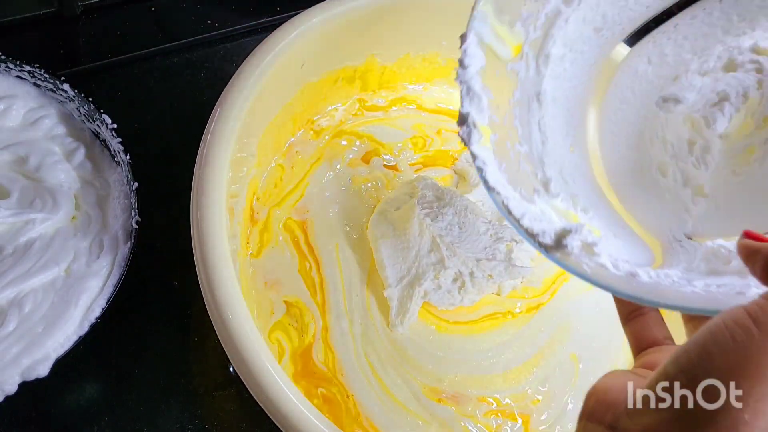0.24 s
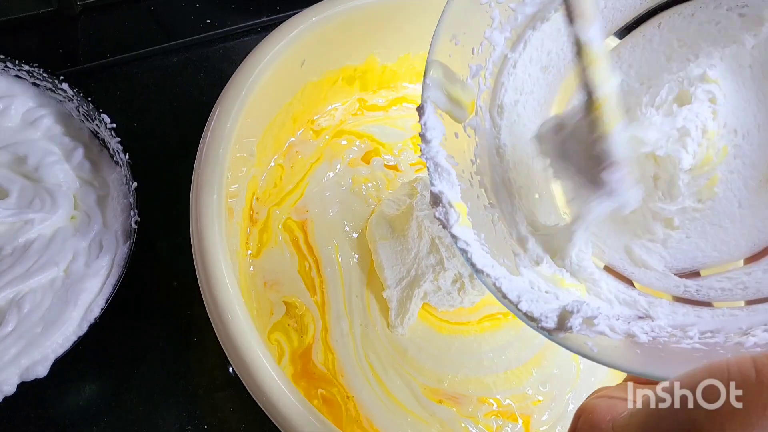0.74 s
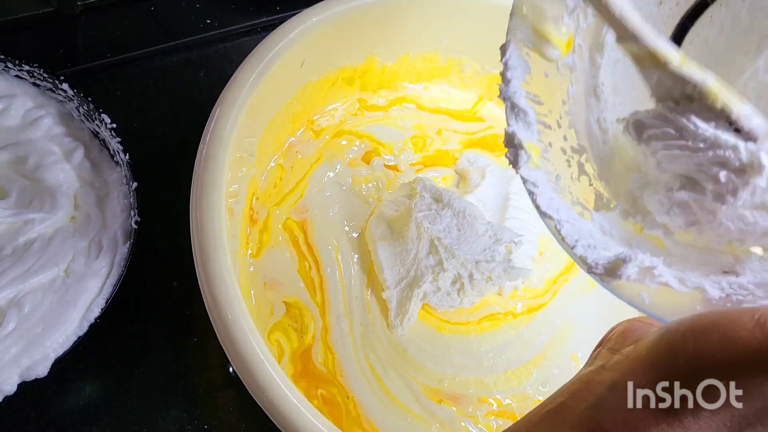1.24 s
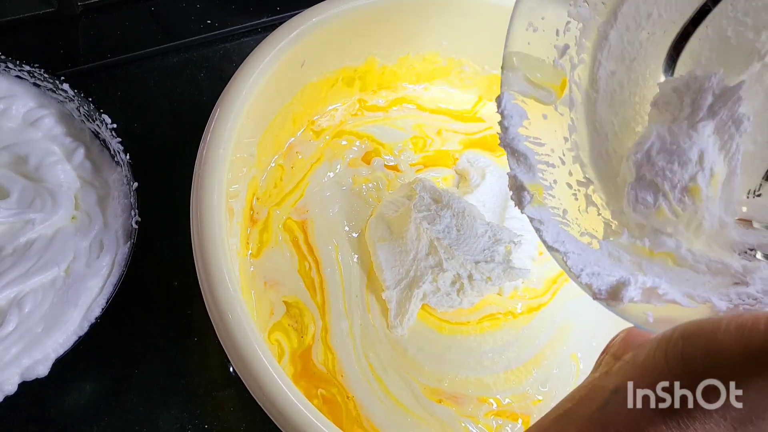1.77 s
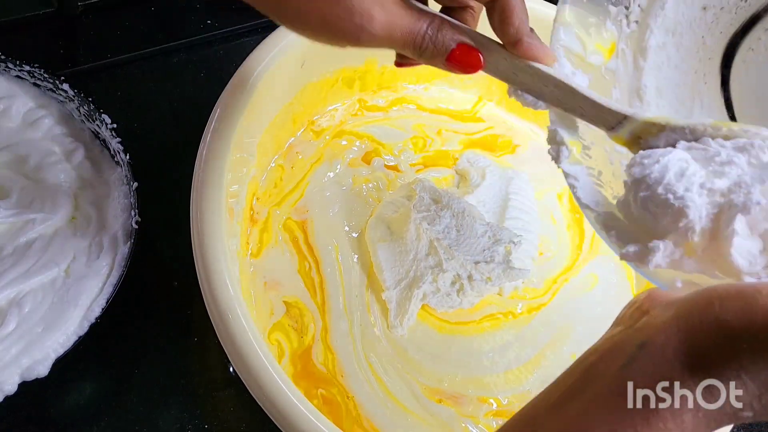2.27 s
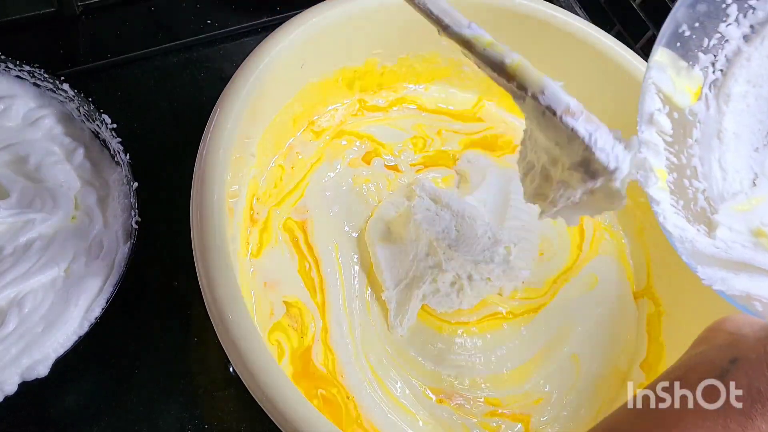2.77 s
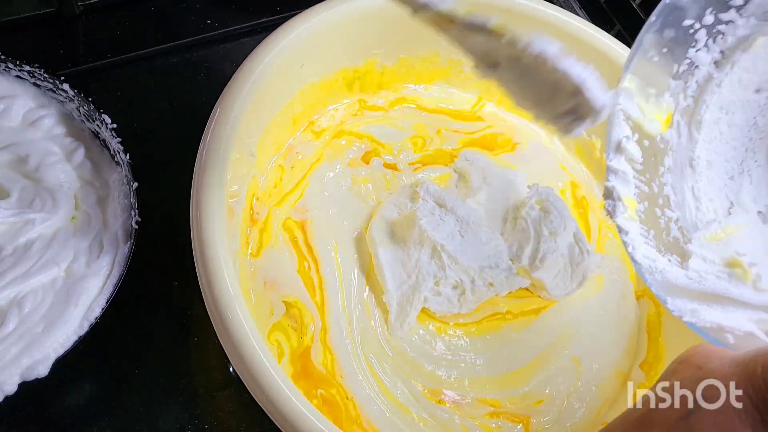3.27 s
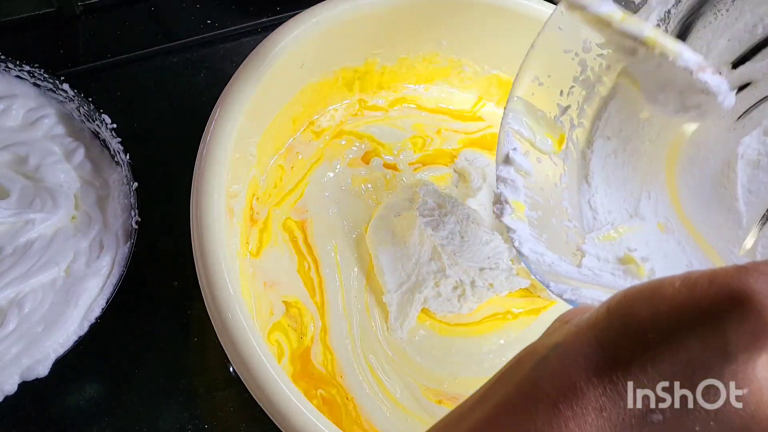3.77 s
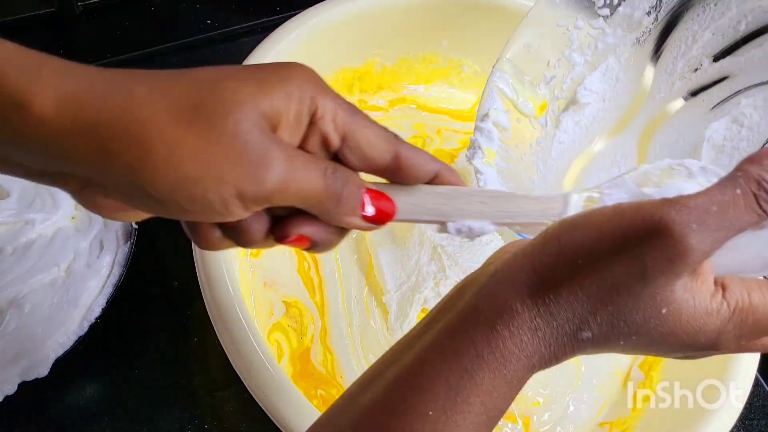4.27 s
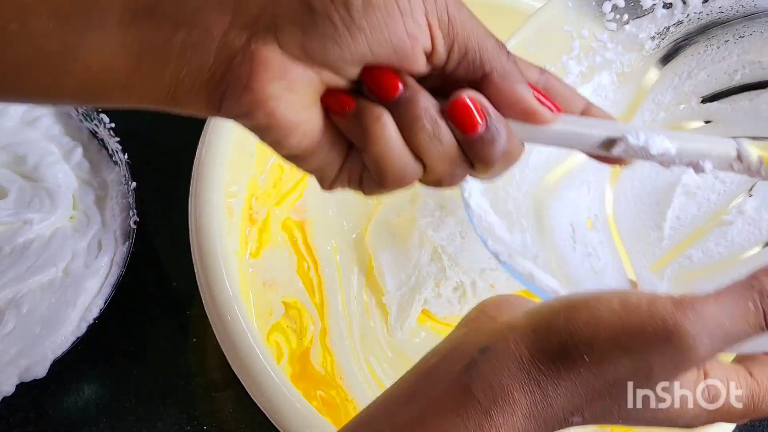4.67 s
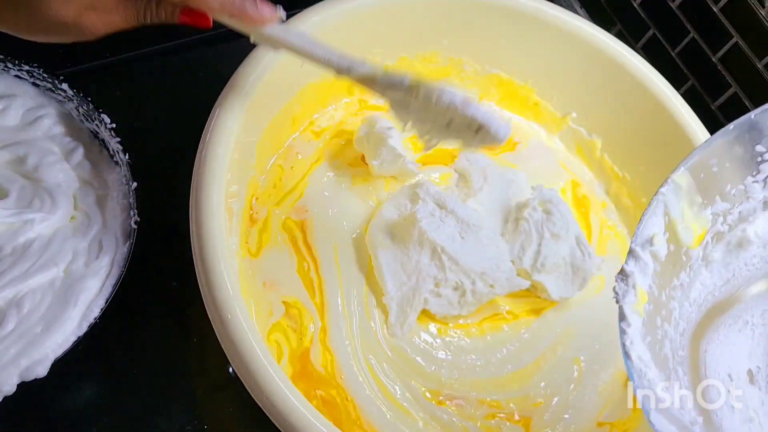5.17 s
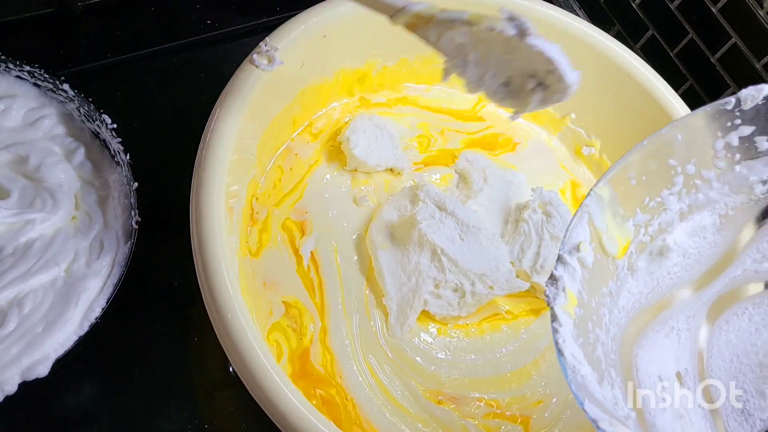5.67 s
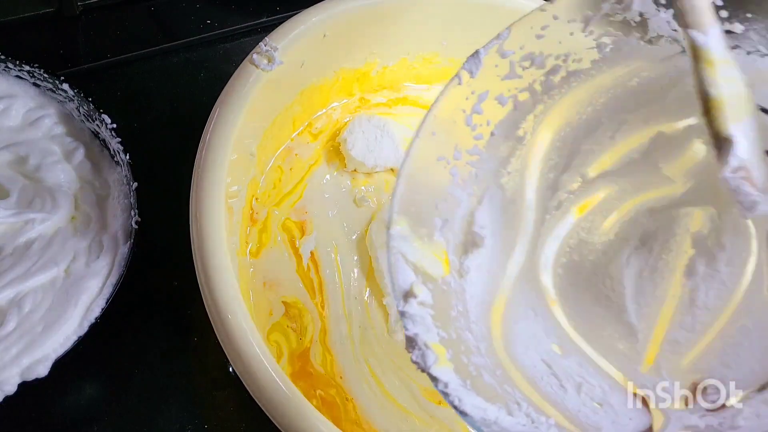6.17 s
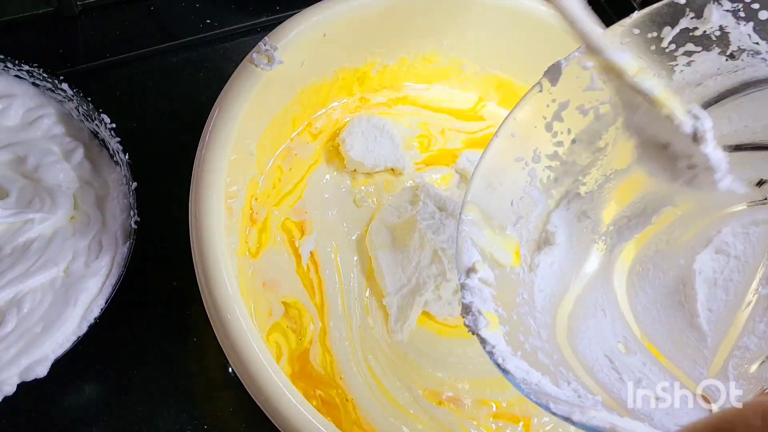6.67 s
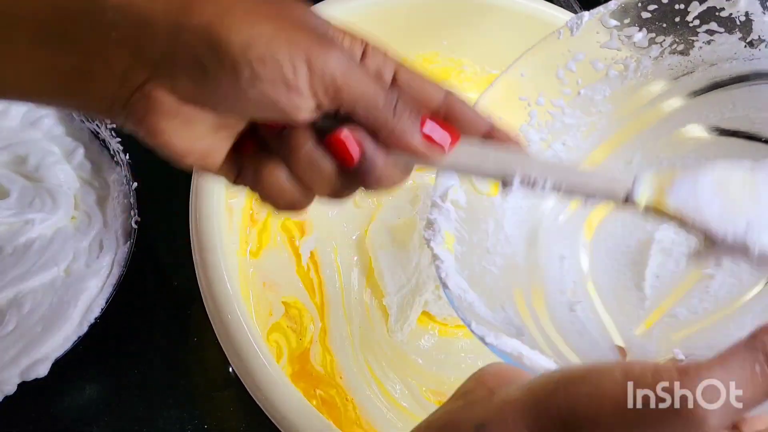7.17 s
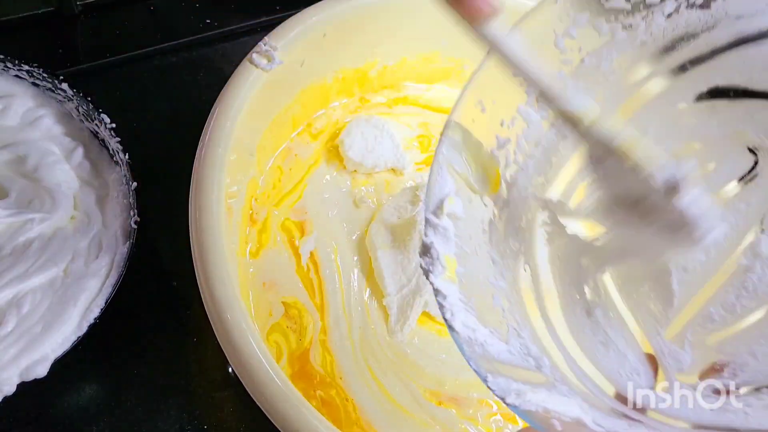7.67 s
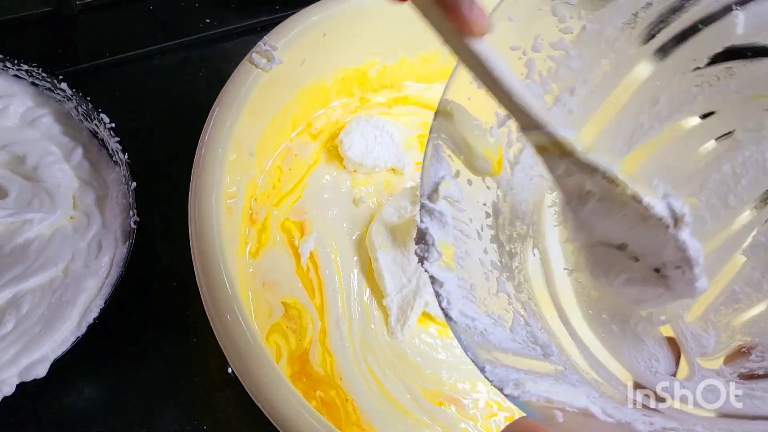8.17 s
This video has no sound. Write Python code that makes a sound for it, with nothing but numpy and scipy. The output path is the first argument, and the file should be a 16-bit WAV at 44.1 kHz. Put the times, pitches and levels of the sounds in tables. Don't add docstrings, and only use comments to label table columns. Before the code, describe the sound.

A wooden spoon scrapes whipped cream from a hand-held glass bowl, with dull knocks and two loud raps on plastic, in a humming kitchen.

```python
import sys
import numpy as np
from scipy import signal
from scipy.io import wavfile

SR = 44100
rng = np.random.default_rng(int(sys.argv[2]) if len(sys.argv) > 2 else 0)


def gain_from_decibels(decibels):
    exponent = np.asarray(decibels, float) / 20
    return 10 ** exponent


def generate_wav(signal):
    frames = np.transpose(np.atleast_2d(signal))
    scaled = np.clip(frames, -1, 1) * 32767
    pcm = np.round(scaled).astype(np.int16)
    wavfile.write(sys.argv[1], SR, pcm)


N = 372108

# f/Hz, width/Hz, level/dB
CABINET = [(347.1, 25, -73.5), (667.41, 24, -80.5), (1554.8, 28, -87.5), (3700, 170, -93.5)]
# t/s, level/dB
COMPRESSOR_LOAD = [(0, -63), (.6, -67), (.9, -81.5), (1.4, -68), (3.5, -64.5), (4.4, -62), (5.0, -70),
                   (6.3, -76), (8.44, -73)]
# f/Hz, density/dB
ROOM_AIR = [(15, -32), (25, -8), (108, 0), (175, -7.5), (242, -20.5), (344, -14), (394, -21.5),
            (659, -33.5), (1020, -30.5), (3250, -44.5), (3720, -37), (5140, -50.5), (7510, -30.5),
            (10400, -40.5), (16000, -53)]
# f/Hz, t60/s, level/dB
KITCHEN = [(79.9, 0.82, -12), (199.4, 0.25, -6.5), (700, 0.16493, -4.5), (1350, .25, -4.5),
           (1967, 0.2899, -2.5), (5000, 0.12, 7), (12000, 0.23, 1.5)]
# f/Hz, likeness/1
LIKENESS = [(60, 0.32), (200, 0.8671), (400, 0.38), (800, 0.54), (1400, 0.18), (4000, 0.017)]
# f/Hz, width/Hz, left/dB, right/dB
PORT_COLOUR = [(830, 420, -3, 2.5), (2600, 1200, 5.5, 4.5), (4800, 2000, .5, -2)]

# f/Hz, density/dB
HANDLING = [(110, -31), (180, -1), (231, -7.5), (343, 0.5), (661, -5.5), (981, -31), (1800, -30),
            (2340, -53), (3960, -120)]
# t/s, swell and fade/s, level/dB
REGRIPS = [
    (.19, 0.05577, -61),
    (.62, 0.05293, -66),
    (1.47, 0.05817, -66),
    (2.5, 0.05924, -59.5),
    (2.93, 0.04563, -58),
    (3.68, 0.0632, -69),
    (4.17, 0.0708, -65),
]
# f/Hz, density/dB
FOAM = [(3000, -12.5), (3800, -8.5), (6200, -7.5), (8500, -1.5), (11300, 3), (14900, -3.5)]
# f/Hz, width/Hz, level/dB
RUB = [(1364.5, 680, -5), (2302.9, 370, -5.5), (2639.5, 110, -8), (3700, 250, -1), (4139.1, 350, -2),
       (4878.7, 450, -3), (6390.5, 370, -2.5)]
# peak t/s, swell/s, fade per 20 dB/s, cream/dB, wood on glass/dB
DRAGS = [(.688, 0.567, 0.1455, -69, -73.5), (1.1, 0.1217, 0.3876, -71.5, -68.5),
         (1.308, 0.142, 1.6733, -80.5, -76), (1.491, 0.0725, 0.12, -66.5, -63),
         (1.58, 0.0831, 0.1864, -67.5, -61.5), (2.18, 0.0847, 0.2146, -72.5, -73.5),
         (2.52, 0.1957, 0.1213, -69.5, -71), (3.26, 0.182, 0.04, -83.5, -79), (3.791, 0.2, 0.1, -61.5, -68),
         (4.0, 0.1885, 0.7639, -71, -67.5), (4.2, 0.15654, 0.5, -79, -60.5),
         (4.686, 0.1233, 0.1079, -69, -74), (4.914, 0.0735, 0.2533, -85, -87), (5.62, .1, 0.2869, -86, -69),
         (6.29, .22, 0.0752, -64, -72), (6.62, .1, 0.8277, -67, -74.5), (6.81, .06, 0.267, -66, -68.5),
         (7.565, .03, .015, -58, -70), (7.656, .2, 0.0717, -73.5, -71.5), (7.88, .014, .018, -57, -63)]
# peak t/s, fade per 20 dB/s, cream/dB, wood on glass/dB
PEELS = [(.11, 0.2126, -67.5, -72.5), (.9, 0.4, -87, -73), (1.82, 0.3478, -70, -72.5),
         (1.97, 0.2897, -65.5, -79.5), (2.652, 0.1917, -74, -69), (2.928, 0.2145, -73.5, -64.5),
         (3.81, 1, -70.5, -75.5), (5.14, 0.0274, -65.5, -73.5), (5.203, 0.0339, -59, -60),
         (7.328, 0.0017, -79.5, -72), (7.79, 0.6, -75, -65.5), (8.07, 0.25, -72, -68)]
# t/s, level/dB, f/Hz, body/dB, pan/dB
SNAPS = [(0.1097, -49.5, 8300, -82, 5.5), (0.219, -52, 4880, -65, 2), (0.8804, -40.5, 10100, -57, -7),
         (1.0077, -41.5, 9200, -83, -5), (1.1284, -34.5, 5970, -46, -3.5), (1.2368, -55, 11600, -77, 10),
         (1.8212, -40.5, 11500, -55.5, 7.5), (1.8546, -43, 12300, -84.5, -9), (1.8931, -50, 8900, -62, 3),
         (2.9332, -59, 5230, -51.5, 7), (3.607, -54.5, 10400, -78.5, 6.5),
         (3.6306, -44.5, 12000, -60, -1.5), (3.7575, -53, 10400, -74.5, 14),
         (3.7874, -59, 10240, -80, 10.5), (5.1494, -52.5, 10700, -72.5, -5),
         (5.196, -45.5, 6890, -56.5, -13), (6.2677, -44, 13200, -65, 0), (6.2924, -52, 10900, -71, -11),
         (6.5954, -35.5, 13100, -52.5, -8.5), (6.8101, -48.5, 10100, -67.5, -2.5),
         (7.426, -47, 12000, -89, 16.5), (7.9469, -53, 4530, -56, 20.5), (8.2147, -50, 7360, -70.5, 3)]
# t/s, level/dB, f/Hz, body/dB, pan/dB
FLECKS = [(.972, -57, 4500, -72, 0), (1.109, -62, 5000, -52, 0), (4.197, -56, 9000, -66, 0),
          (3.6176, -52, 6560, -75, -6.5), (7.822, -56, 9500, -85, 0), (7.826, -56, 9500, -85, 0),
          (7.855, -62, 5000, -66, 0), (7.9977, -49, 9000, -80, 3.5), (8.056, -52, 13000, -80, 0),
          (8.072, -51, 11000, -80, 0), (8.1349, -50, 10800, -82, 3), (8.2382, -55, 7900, -82, 1)]

# t/s, level/dB, crack/dB
RAPS = [
    (5.279, -1.5, -35.5),
    (5.481, -5, -40.5),
]
# f/Hz, level/dB, t60/s
PLASTIC = [(900, 4.5, 0.022), (1044, 2, 0.0066), (1200, -14, 0.045), (1380, -9.5, .022), (1620, -13, 0.014),
           (590, -1.5, 0.037)]
# t/s, level/dB, sharpness/Hz, rattle/dB
SLAPS = [(5.2827, -2, 700, -34), (5.2928, -2.5, 700, -36), (5.3029, -3, 700, -37), (5.3131, -9.5, 700, -35),
         (5.3290, -15.5, 500, -39), (5.3372, -13, 800, -42), (5.3461, -14, 800, -43),
         (5.355, -13, 800, -46), (5.4848, -4, 600, -37), (5.4951, -7.5, 800, -38), (5.505, -13, 407, -43),
         (5.514, -15, 400, -45), (5.520, -15, 408, -46), (5.5295, -14, 411, -48)]
# f/Hz, level/dB, t60/s
COUNTER = [(58, -26, .15), (88, -23.5, 0.5), (121, -14, 0.26), (137, -11, .15), (197, -5, 0.083),
           (198, -18, .22), (250, -13, .05), (300, -10.5, .05), (440, -6.5, .05), (505, -5.5, .06)]

# t/s, belly/dB, rim ring/dB, wall/dB, crack/dB
KNOCKS = [(1.584, -17.5, -29, -33, -50), (1.9962, -50, -44, -44, -65.5), (2.003, -47.5, -53.5, -66, -54),
          (2.067, -50, -58.5, -53, -66.5), (2.193, -25.5, -41.5, -41, -60.5),
          (3.525, -32.5, -36.5, -41.5, -56), (6.018, -35, -45, -48.5, -57.5), (6.085, -65, -61.5, -61, -64),
          (6.5106, -26, -33.5, -24, -38.5), (7.332, -78, -49, -77, -66.5),
          (7.539, -27.5, -33.5, -33, -57.5), (7.5572, -28.5, -28.5, -53, -64), (7.765, -45, -34, -50, -54),
          (7.874, -54.5, -36, -48, -62), (7.927, -49, -67, -59.5, -51.5), (8.047, -61.5, -47, -68, -57.5),
          (8.17, -47, -64.5, -68.5, -65.5)]
# f/Hz, level/dB, t60/s
RIM = [(360, 6.5, 0.03152), (459.26, -4, 0.034), (253, -4, 0.0071)]
# f/Hz, level/dB, t60/s
BELLY = [(600, -3, 0.03), (690, -5, 0.0024)]
# f/Hz, level/dB, t60/s
EDGE = [(1270, 0, .008), (2340, -5, .008), (3010, -9, .006), (3700, -8, .006)]
# t/s, clack/dB, ring/dB
BARE_EDGE = [
    (6.018, -44, -65),
    (6.085, -45, -65),
    (6.5106, -14, -15),
    (7.539, -38, -55),
    (8.047, -42, -65),
]
# t/s, level/dB, sharpness/Hz, direction/1
SHOVES = [
    (1.997, -30, 800, -1),
    (7.767, -17, 400, 1),
    (7.8755, -23, 380, 1),
    (8.05, -32, 320, 1),
]
# t/s, level/dB, f/Hz, t60/s
THUDS = [(0.126, -43.5, 146, 0.04784), (1.129, -28.5, 215, 0.032), (1.157, -33.5, 156.9, 0.01566),
         (1.822, -34, 228.6, 0.012058), (1.996, -36.5, 153.8, 0.01709), (2.193, -38, 155, 0.029),
         (.566, -53.5, 621.3, 0.0422), (1.006, -56, 700, 0.02064), (7.333, -39.5, 300, .025),
         (8.048, -39, 258.2, 0.0154), (2.925, -44, 221.3, 0.0494), (3.525, -28.5, 356.8, 0.075),
         (4.399, -56.5, 360.7, 0.08835), (6.021, -26.5, 360, 0.06423), (6.523, -35.5, 363.7, 0.09),
         (7.767, -30, 582, 0.03248), (7.876, -40, 590, 0.0309)]
# t/s, level/dB, f/Hz, t60/s
PINGS = [
    (1.997, -44, 1850, 0.022),
    (1.998, -54, 2430, 0.0196),
    (1.997, -45, 1359, 0.0429),
    (2.000, -54, 3700, 0.0702),
    (2.002, -57, 5030, 0.025),
    (2.194, -58.5, 4997, 0.0196),
    (2.218, -64, 3603, 0.0874),
    (2.218, -67.5, 4855, 0.103),
    (7.540, -44, 2735, 0.01917),
]
# start t/s, end t/s, level/dB, f/Hz
SKIDS = [(1.1, 1.148, -42.5, 613.8), (1.114, 1.137, -51, 8070), (1.155, 1.16, -52.5, 9120),
         (1.546, 1.604, -49, 614.5), (2.171, 2.205, -48.5, 1200), (2.65, 2.695, -58.5, 1737),
         (2.927, 2.952, -48, 886.7), (5.6, 5.716, -72.5, 4470), (6.09, 6.112, -53, 1600),
         (6.504, 6.512, -45.5, 1600), (7.515, 7.536, -48, 1284), (7.526, 7.545, -36, 400)]


def rms_one(x):
    return x / np.sqrt(np.mean(x ** 2) + 1e-20)


def at_hz(points, hz, axis=1):
    points = np.array(points)
    return np.interp(np.log(hz), np.log(points[:, 0]), points[:, axis])


def curves(rows):
    s, *columns = np.transpose(rows)
    return [np.interp(np.arange(N) / SR, s, column) for column in columns]


def delayed(x, s):
    return np.interp(np.arange(N) - s * SR, np.arange(N), x)


def highpass(x, order, hz):
    return signal.sosfilt(signal.butter(order, hz, "high", fs=SR, output="sos"), x)


def drift(rate, db=None):
    r = np.exp(-80 * np.pi * rate / SR)
    chance = rng.standard_normal(N // 40 + 2002)
    slow = rms_one(signal.lfilter([1], [1, -2 * r, r * r], chance)[2000:])
    if db is not None:
        slow = gain_from_decibels(db * slow)
    return np.interp(np.arange(N) / 40, np.arange(len(slow)), slow)


def resonate(x, hz, width):
    r = np.exp(-np.pi * width / SR)
    zeros = np.array([1, 0, -1]) * (1 - r * r) / 2
    return signal.lfilter(zeros, [1, -2 * r * np.cos(2 * np.pi * hz / SR), r * r], x)


def bands(white, gain):
    out, edges = 0, 22 * 2 ** np.arange(0, 9.8, .4)
    for k, (low, high) in enumerate(zip(edges, edges[1:])):
        hz = np.sqrt(low * high)
        g = gain(hz)
        if np.max(g) > 0:
            sos = signal.butter(2, [low, high], "band", fs=SR, output="sos")
            mid, side = signal.sosfilt(sos, white[k % 2])
            alike = np.clip(at_hz(LIKENESS, hz), -1, 1)
            out = out + g * (np.sqrt(1 + alike) * mid + np.sqrt(1 - alike) * side * [[1], [-1]])
    return out


def add(track, s, sound, db):
    i = round(s * SR)
    track[i:i + len(sound)] += (gain_from_decibels(db) * sound / np.abs(sound).max())[:N - i]


def ring(modes, rise_s):
    t = np.arange(SR // 6) / SR
    hz, db, t60 = np.transpose(modes)[:, :, None]
    sines = gain_from_decibels(db - 60 * t / t60) * np.sin(2 * np.pi * hz * t)
    return sines.sum(0) * (1 - np.exp(-t / rise_s))


def struck(modes, rise_s, spread_db):
    hz, db, t60 = np.transpose(modes)
    strength, tuning = rng.standard_normal((2, len(modes)))
    return ring(np.transpose([hz * (1 + 0.022 * tuning), db + spread_db * strength, t60]), rise_s)


def crack(low_hz, high_hz, t60, grit):
    t = np.arange(SR // 8) / SR
    sos = signal.butter(2, [low_hz, min(high_hz, .45 * SR)], "band", fs=SR, output="sos")
    noise = grit * rng.standard_normal(len(t)) * gain_from_decibels(-60 * t / max(t60, .002))
    return signal.sosfilt(sos, noise + (t == 0))


def rounded_push(sharp_hz, centre_s, samples):
    x = (np.pi * sharp_hz * (np.arange(samples) / SR - centre_s)) ** 2
    return (1 - 2 * x) * np.exp(-x)


def fridge():
    white = rng.standard_normal((2, 2, N))
    air = gain_from_decibels(-61) * rms_one(bands(white, lambda hz: gain_from_decibels(at_hz(ROOM_AIR, hz)) * drift(3, db=1.4296)))
    for hz, width, db in CABINET:
        swell = gain_from_decibels(db) * drift(3, db=1.5)
        breath = resonate(white[0, 0] + 0.24 * white[1], hz, width)
        air += swell * rms_one(resonate(breath, hz, width))
    hiss_band = signal.butter(6, [7300, 11600], "band", fs=SR, output="sos")
    air += gain_from_decibels(-85) * rms_one(signal.sosfilt(hiss_band, white[0]))
    compressor_db, = curves(COMPRESSOR_LOAD)
    t = np.arange(N) / SR
    slip_hz, slip_peak_s, slip_depth = 1.53, 3.82, 0.22
    beat = 1 + slip_depth * np.cos(2 * np.pi * slip_hz * (t - slip_peak_s))
    double_db = -60 + 20 * np.log10(beat)
    # f/Hz, level/dB, waver/Hz
    tones = [(49.3, -59, .4), (100.1, double_db, .4), (157.4, compressor_db, .4), (39, -72.5, .6)]
    for hz, db, waver_hz in tones:
        phase = 2 * np.pi * (hz * t + np.cumsum(waver_hz * drift(4)) / SR)
        level = np.sqrt(2) * gain_from_decibels(db + 3.9 * waver_hz * drift(2.7))
        air += level * np.sin(phase) * gain_from_decibels([[.6], [-.6]])
    return air


def kitchen(x):
    hall_t60_s, hall_db = 0.54653, -17.5
    t = np.arange(SR * 3 // 4) / SR
    late = gain_from_decibels(hall_db - 60 * t / hall_t60_s)

    def decay(hz):
        return gain_from_decibels(at_hz(KITCHEN, hz, axis=2)) * (gain_from_decibels(-60 * t / at_hz(KITCHEN, hz)) + late)

    tail = bands(rng.standard_normal((2, 2, len(t))), decay)
    tail *= np.clip((t - .003) / 0.00059, 0, 1) / np.sqrt(SR * 0.03)
    return signal.fftconvolve(x[None], tail, axes=1)[:, :N]


def ports(x, shade_db):
    echo_s, echo_db = (.0011, .0017), (-4, -2)
    treble = highpass(x, 1, 2500)
    shaded = x + (gain_from_decibels(shade_db) - 1) * highpass(x, 1, 8000)
    return np.array([direct + gain_from_decibels(db) * delayed(treble, s)
                     for direct, s, db in zip([shaded, x], echo_s, echo_db)])


def coloured(x):
    for hz, width, *db in PORT_COLOUR:
        x = x + (gain_from_decibels(np.array(db))[:, None] - 1) * resonate(x, hz, width)
    return x


def grip(rub_db):
    jolt_db, jolt_t60_s = -31.5, 0.22
    t = np.arange(0, N + 40, 40) / SR
    moves = np.zeros(len(t))
    for s, belly_db, *_ in KNOCKS:
        moves += gain_from_decibels(belly_db + jolt_db - 60 * np.clip(t - s, 0, 9) / jolt_t60_s) * (t > s)
    for s, span_s, db in REGRIPS:
        moves += gain_from_decibels(db) * np.exp(-((t - s) / span_s) ** 2)
    rumble = gain_from_decibels(-66.5 + .4 * (rub_db + 76))
    return rumble + np.interp(np.arange(N) / SR, t, moves)


def contact():
    peel_swell_s, swell_curve, rest_db = 0.014184, 0.5, -95
    t = np.arange(0, N + 40, 40) / SR
    power = gain_from_decibels(2 * rest_db)
    peels = [(s, peel_swell_s, *rest) for s, *rest in PEELS]
    for s, swell_s, fade_s, *db in list(DRAGS) + peels:
        swell = np.clip(1 + (t - s) / swell_s, 0, 1) ** swell_curve
        shape = swell * gain_from_decibels(-20 * np.clip(t - s, 0, 9) / fade_s)
        power = power + (gain_from_decibels(np.array(db))[:, None] * shape) ** 2
    return [np.interp(np.arange(N) / SR, t, 10 * np.log10(p)) for p in power]


def stroke():
    cream_db, rub_db = contact()
    white = rng.standard_normal((2, 2, N))
    burst = gain_from_decibels(2.4 * np.minimum(rng.exponential(1, N), 5))
    grains = burst * (rng.random(N) < 9000 / SR) + 0.24
    fizz = white * grains * drift(30, db=2.5)
    cream = bands(fizz, lambda hz: gain_from_decibels(at_hz(FOAM, hz)) * (hz > 3000))
    rub = 0
    for hz, width, db in RUB:
        rub = rub + gain_from_decibels(db) * resonate(white[1] * grains * drift(40, db=1.0954), hz, width)
    hand = bands(white[::-1], lambda hz: gain_from_decibels(at_hz(HANDLING, hz)) * drift(18, db=3.0) * (180 < hz < 1800))
    cream = gain_from_decibels(cream_db) * rms_one(cream) * gain_from_decibels([[-1.5], [1.5]])
    rub = gain_from_decibels(rub_db - 3.0 + 0.91 * drift(22)) * rms_one(rub)
    return cream + rub + gain_from_decibels(-4.0) * grip(rub_db) * rms_one(hand)


def snaps(rows):
    t60_s = .016
    out = np.zeros((2, N))
    for s, db, hz, body_db, pan_db in rows:
        top = crack(.45 * hz, 1.8 * hz, t60_s, grit=.5)
        body = crack(700, 3200, 1.5 * t60_s, grit=.4)
        for side, track in zip((.5, -.5), out):
            add(track, s, top, db + side * pan_db)
            add(track, s, body, body_db + 4 + side * pan_db)
    return out


def plastic_bowl():
    out, pushes = np.zeros(N), 1e-12 * rng.standard_normal(N)
    for s, db, crack_db in RAPS:
        add(out, s - .0008, -struck(PLASTIC, 0.0015, 0.89), db - 3.5)
        add(out, s, -crack(1700, 5000, .01, grit=.04), crack_db + 18)
        add(out, s, crack(7900, 14000, .01, grit=.06), crack_db + 7.5)
    t = np.arange(-150, 150) / SR
    for s, db, sharp_hz, rattle_db in SLAPS:
        add(pushes, s + t[0], np.exp(-(np.pi * sharp_hz * t) ** 2), db)
        add(out, s, crack(1250, 5500, .025, grit=.8), rattle_db + 1.5)
    rings = sum(gain_from_decibels(db) * resonate(pushes, hz, 3.3 / t60) * t60 * 30 for hz, db, t60 in COUNTER)
    return out + gain_from_decibels(-1.5) * highpass(pushes, 1, 150) + gain_from_decibels(-4.5) * rings


def skid(start, end, hz):
    span = max(round((end - start) * SR), 50)
    hold = np.sin(np.pi * np.linspace(0, 1, span) ** 1.5) ** 1.1
    rough = resonate(rng.standard_normal(span) * hold, hz, 0.58 * hz)
    return resonate(rough, hz, 0.8 * hz)


def glass():
    smothered_edge_db = -15.5
    out = 1e-12 * rng.standard_normal(N)
    for s, belly_db, rim_db, wall_db, crack_db in KNOCKS:
        add(out, s, rounded_push(750, .0018, SR // 200), belly_db - 1.0)
        add(out, s + 0.001406, struck(RIM, 0.00046, 0.93), rim_db + 6.5)
        add(out, s + 0.0012604, struck(BELLY, 0.001, 0.98), belly_db - 4.0)
        add(out, s + .0008, crack(850, 1700, .008, grit=.04), wall_db + 8)
        add(out, s + .0008, -crack(1700, 4600, .01, grit=.06), crack_db + smothered_edge_db + 17)
        add(out, s + .0008, crack(5500, 13830, 0.018, grit=0.15), crack_db + 17.5)
    for s, db, sharp_hz, direction in SHOVES:
        add(out, s - .005, direction * rounded_push(sharp_hz, .005, SR // 100), db)
    for s, clack_db, ring_db in BARE_EDGE:
        add(out, s + .0004, -ring(EDGE, .0006), ring_db)
        add(out, s + .0008, -crack(1700, 4600, .01, grit=.06), clack_db)
    for s, db, hz, t60 in THUDS:
        add(out, s, struck([(hz, 0, t60), (1.7 * hz, -14, .02)], 0.0037, 0), db)
    for s, db, hz, t60 in PINGS:
        add(out, s, crack(hz - 110, hz + 110, t60, grit=0.91), db)
    for start, end, db, hz in SKIDS:
        add(out, start, skid(start, end, hz), db)
    return highpass(out, 2, 110)


def scene():
    held, big, small = glass(), plastic_bowl(), snaps(SNAPS)
    wet = kitchen(gain_from_decibels(-6.5) * held + big + gain_from_decibels(-16) * small.mean(0))
    direct = ports(held + big, shade_db=-8) * gain_from_decibels([[-.3], [.3]])
    bowls = coloured(direct + wet)
    left, right = bowls + small + stroke() + fridge() + snaps(FLECKS)
    return np.array([delayed(left, 0.00018895), right])


def roll_off(x):
    return signal.sosfilt(signal.butter(12, 16680, fs=SR, output="sos"), x)


def record(dry):
    firm = highpass(dry, 2, 32)
    rounded = 1.2336 * np.tanh(firm / 1.1355)
    mix = signal.sosfilt(signal.cheby2(14, 32, 16150, fs=SR, output="sos"), rounded)
    return roll_off(mix)


dry = scene()
out = record(dry)
generate_wav(out)
```